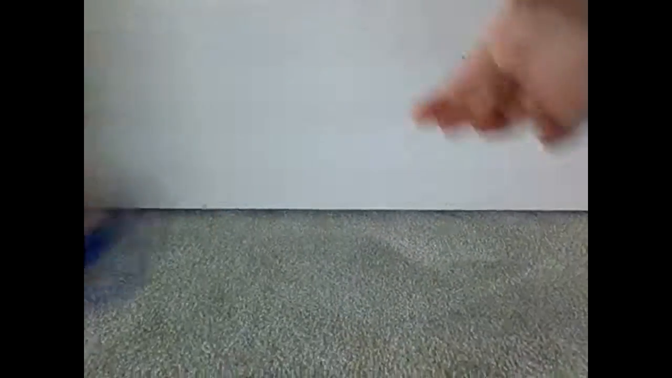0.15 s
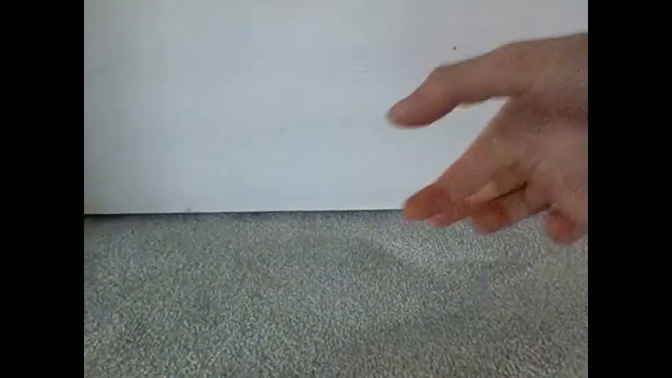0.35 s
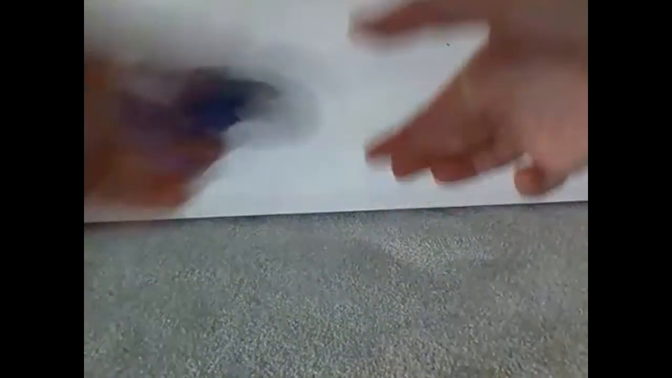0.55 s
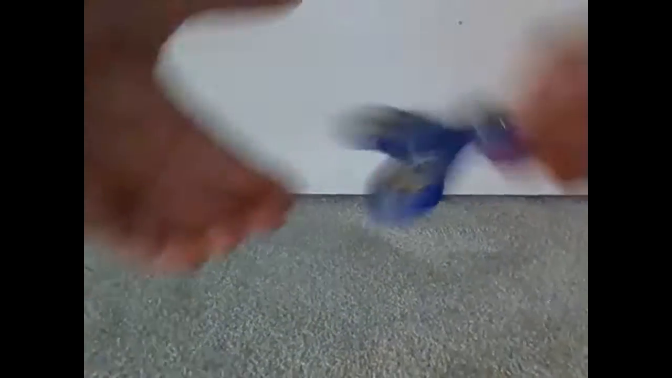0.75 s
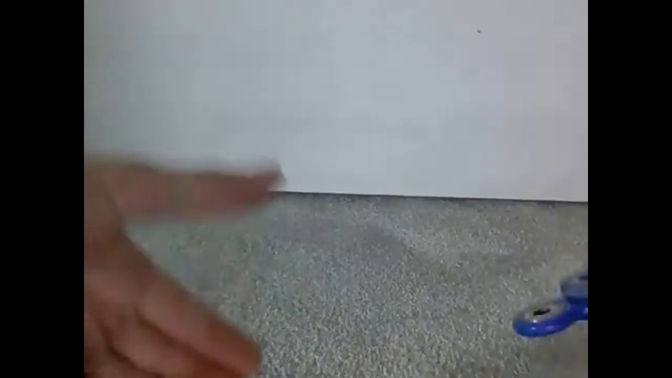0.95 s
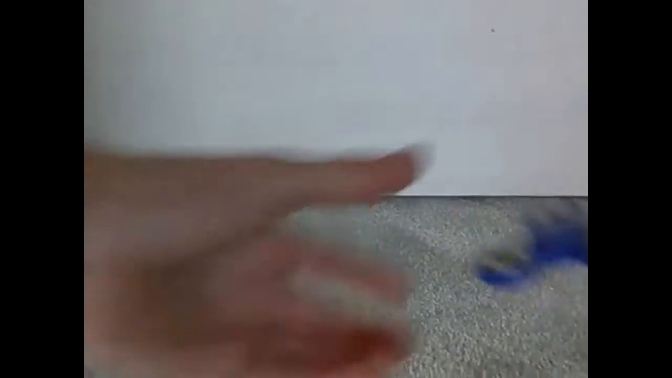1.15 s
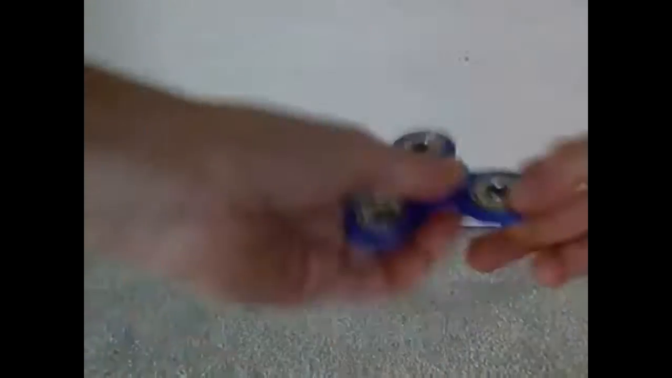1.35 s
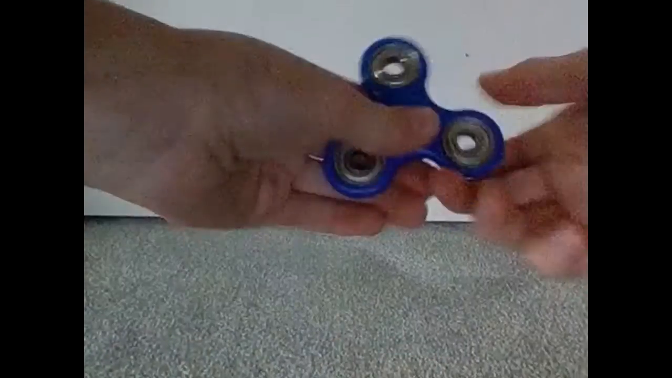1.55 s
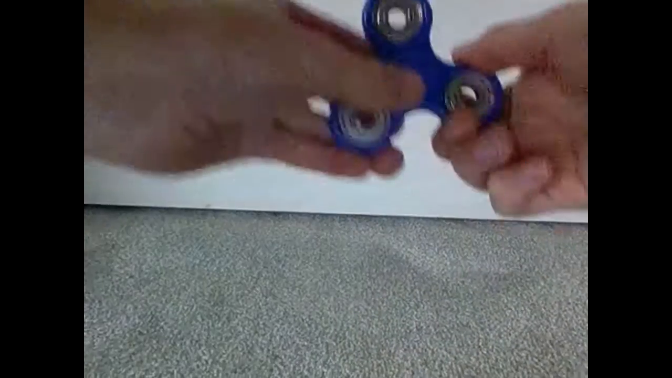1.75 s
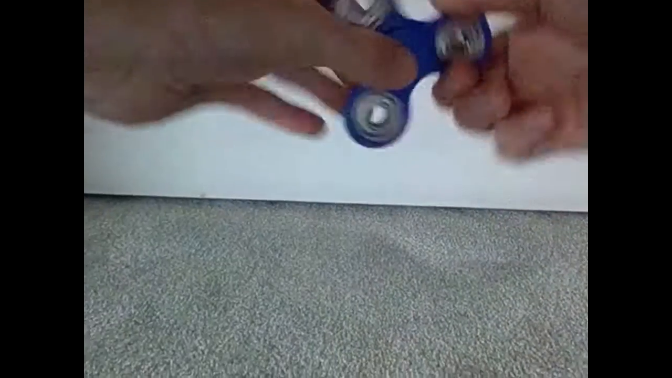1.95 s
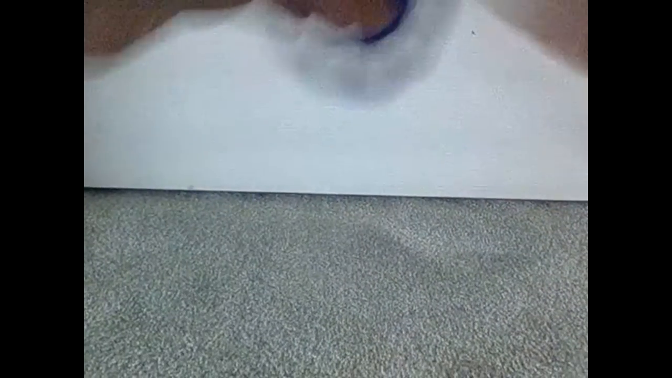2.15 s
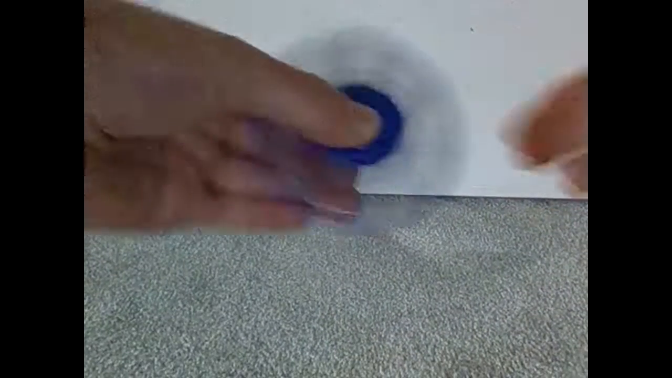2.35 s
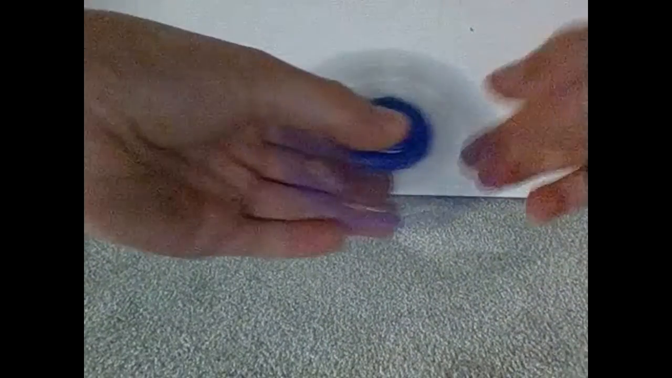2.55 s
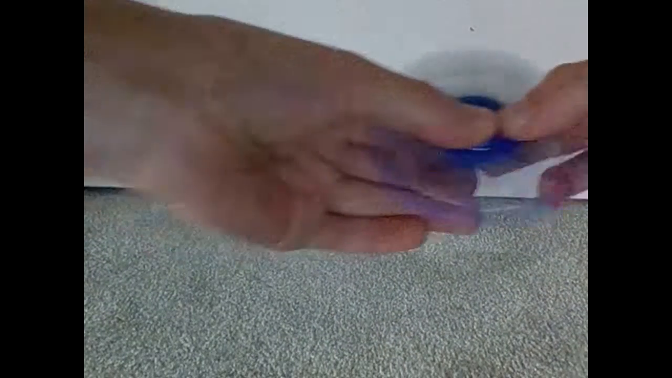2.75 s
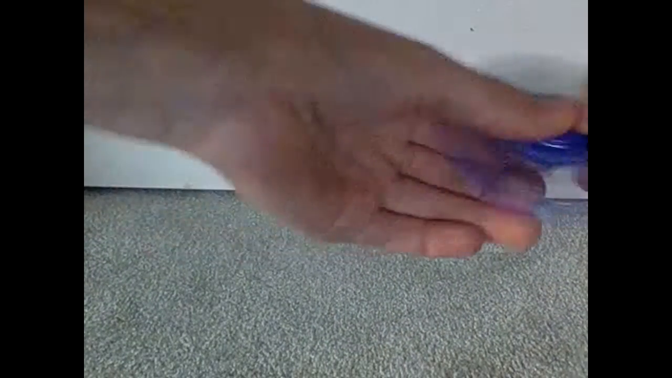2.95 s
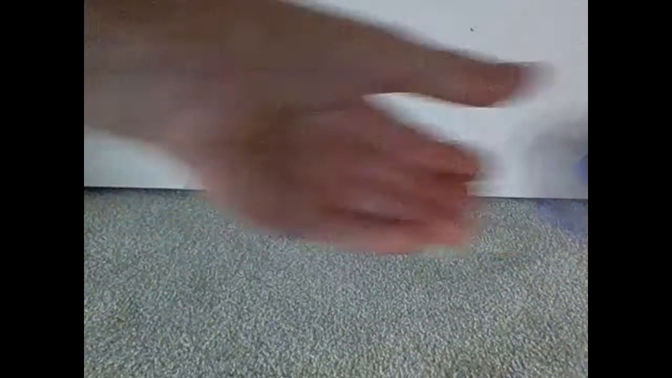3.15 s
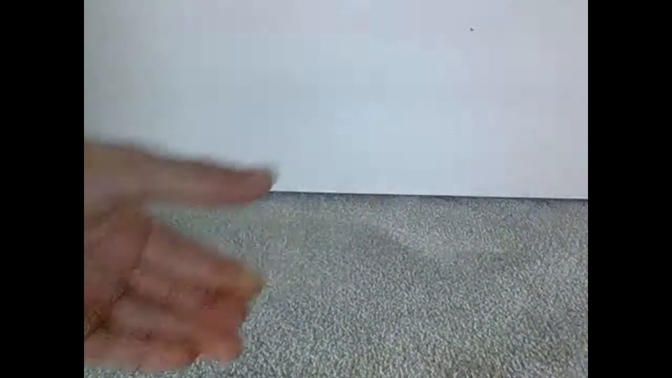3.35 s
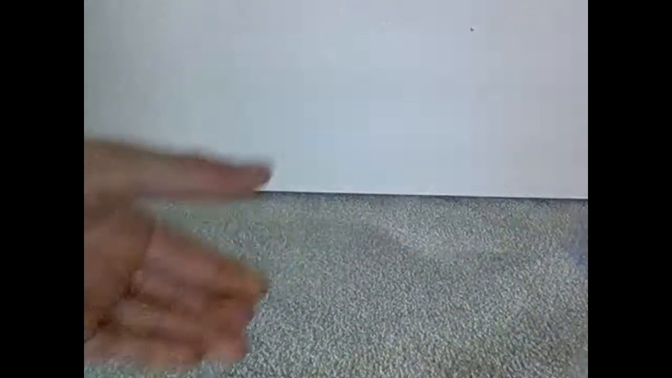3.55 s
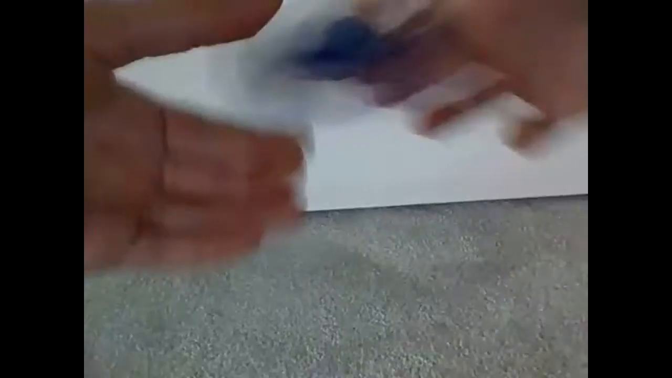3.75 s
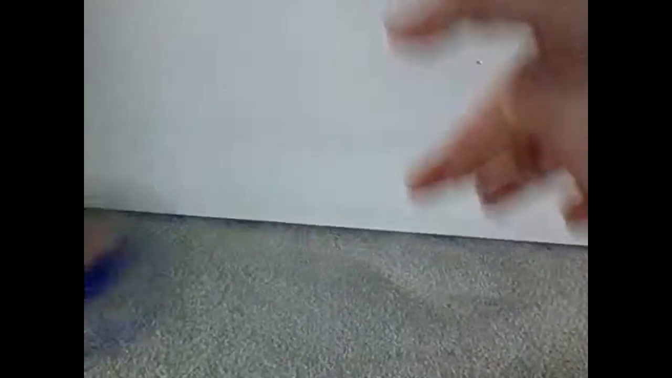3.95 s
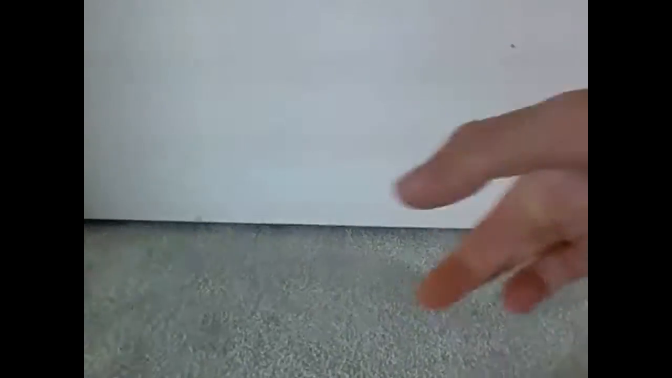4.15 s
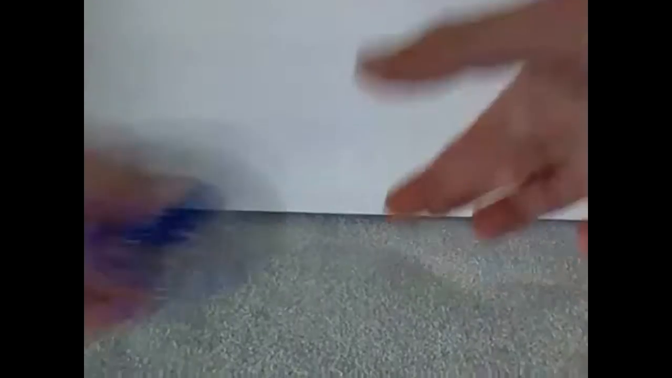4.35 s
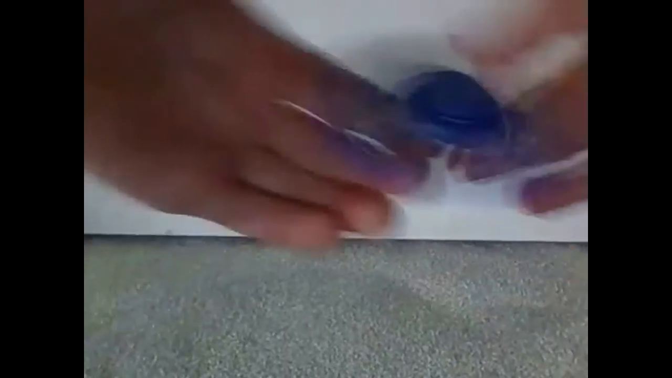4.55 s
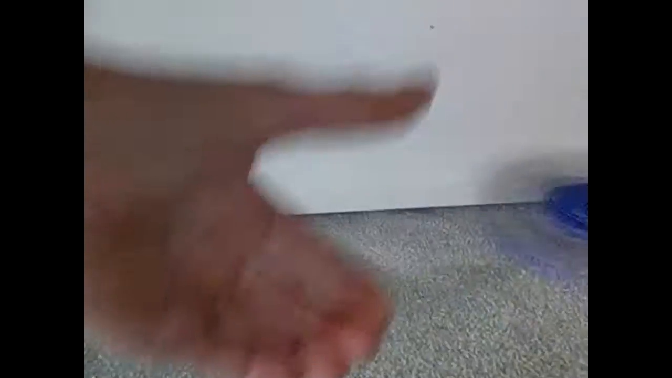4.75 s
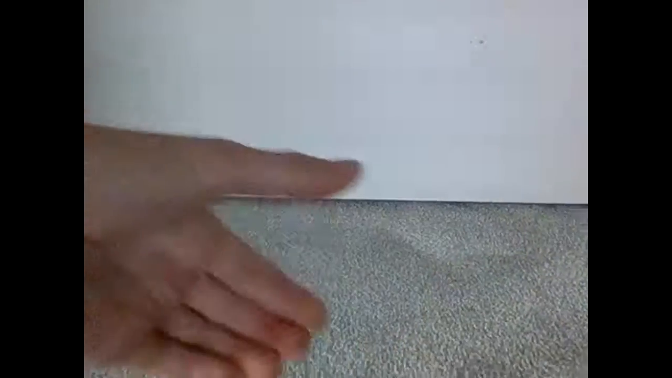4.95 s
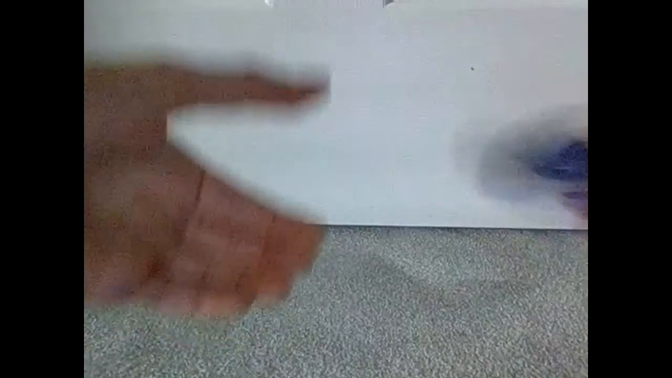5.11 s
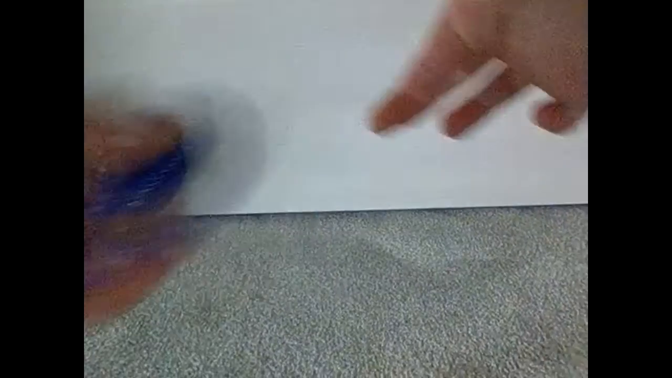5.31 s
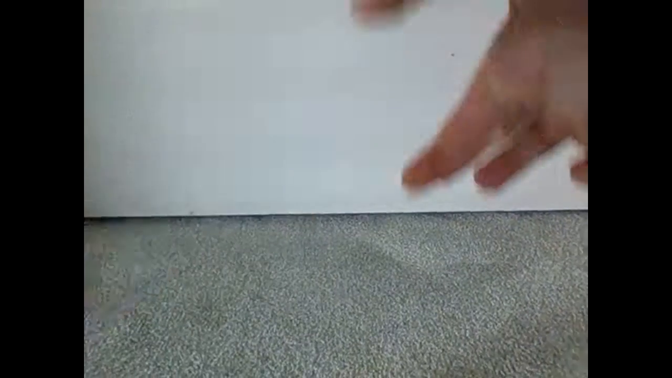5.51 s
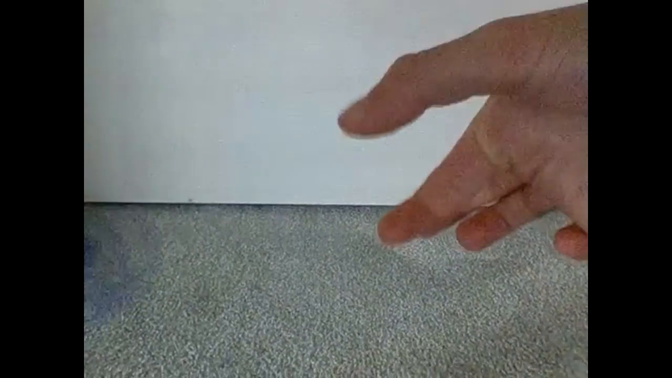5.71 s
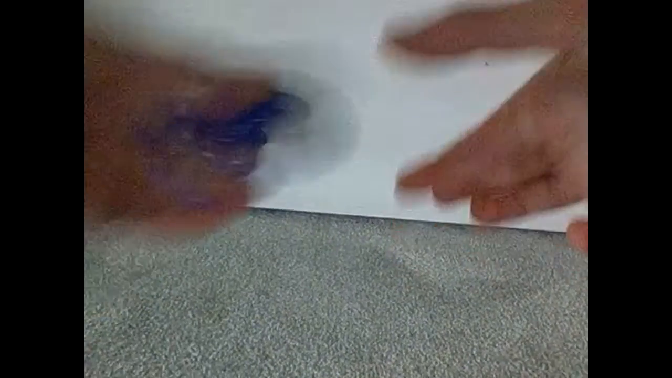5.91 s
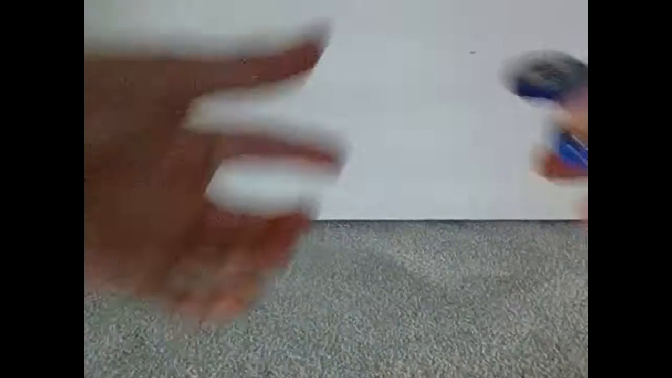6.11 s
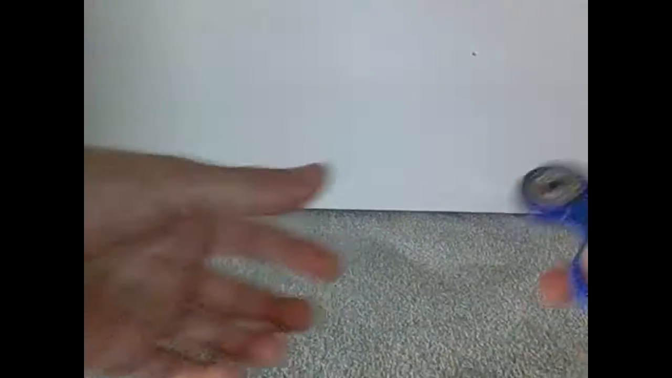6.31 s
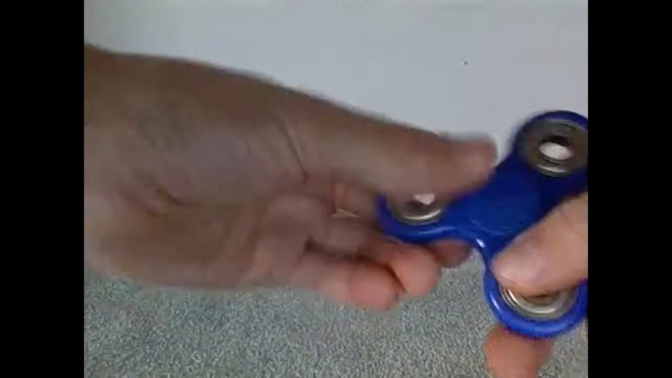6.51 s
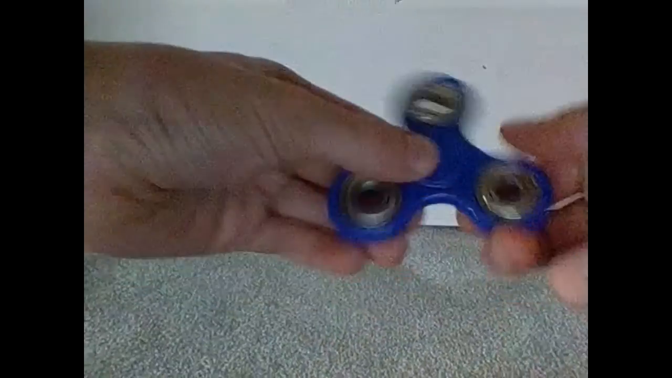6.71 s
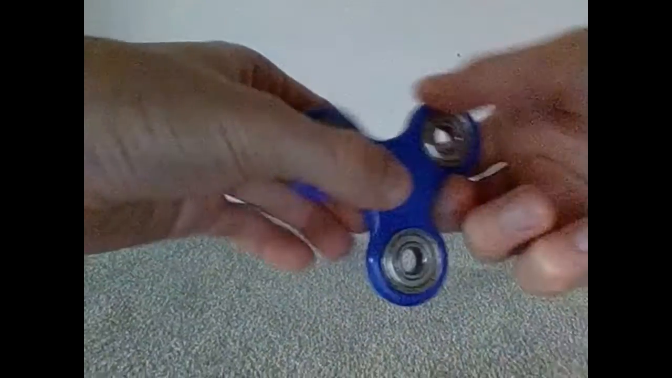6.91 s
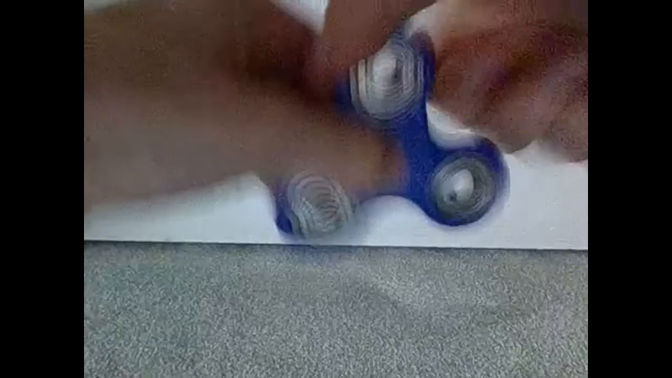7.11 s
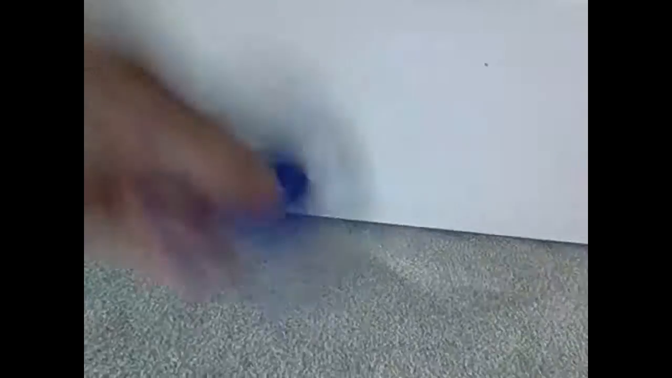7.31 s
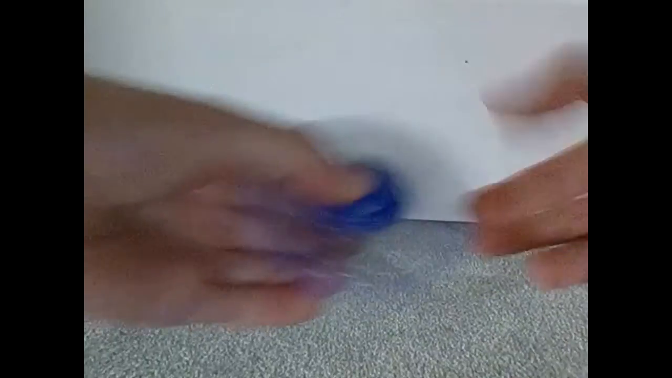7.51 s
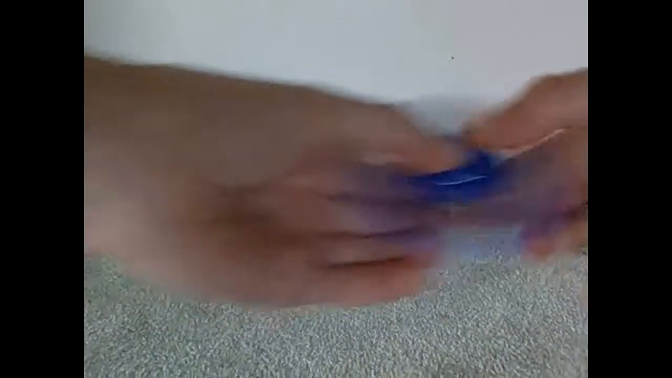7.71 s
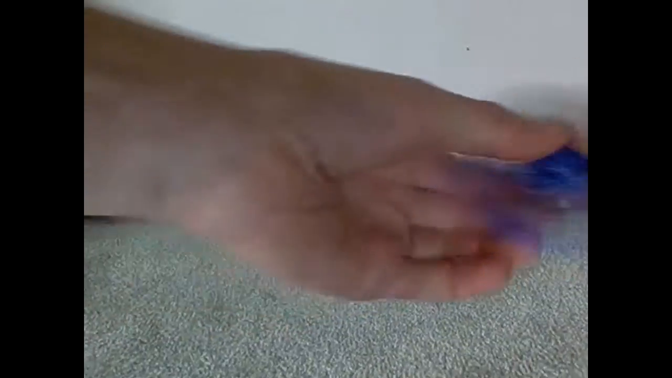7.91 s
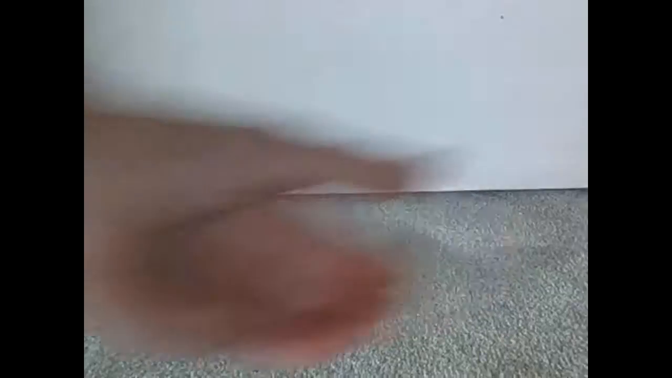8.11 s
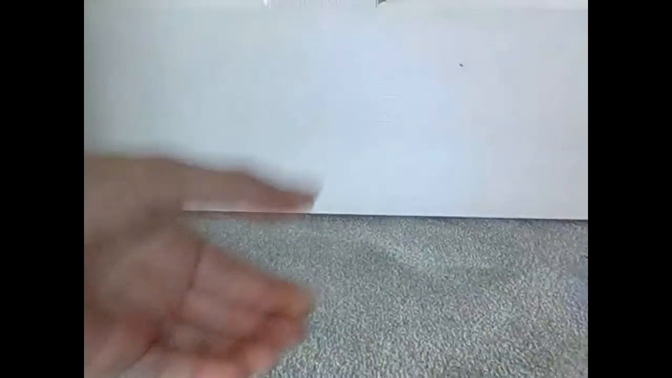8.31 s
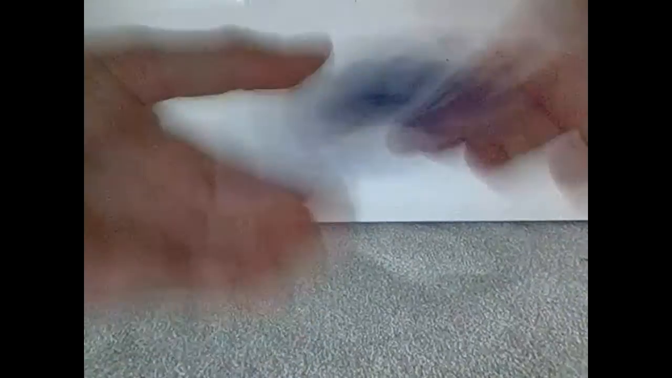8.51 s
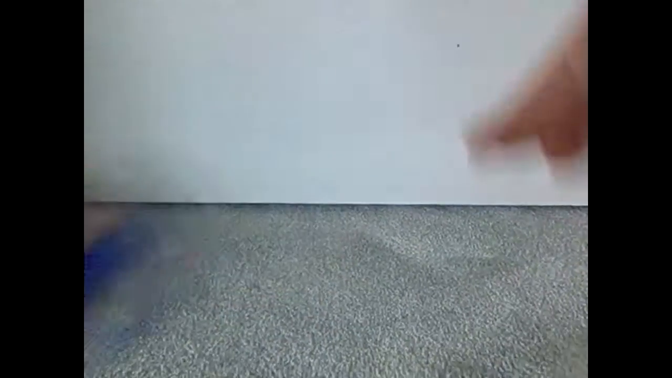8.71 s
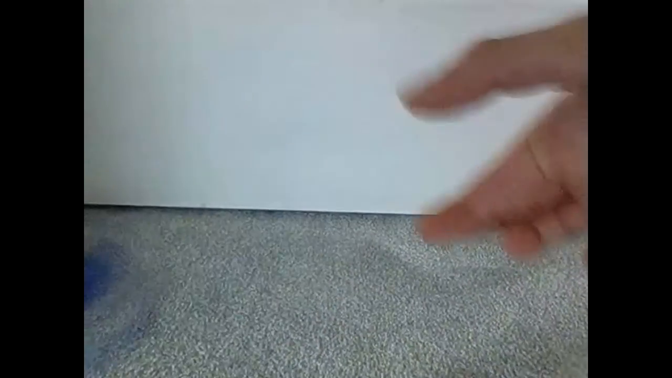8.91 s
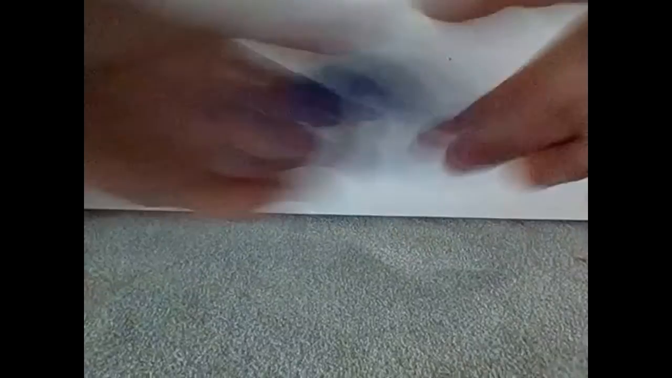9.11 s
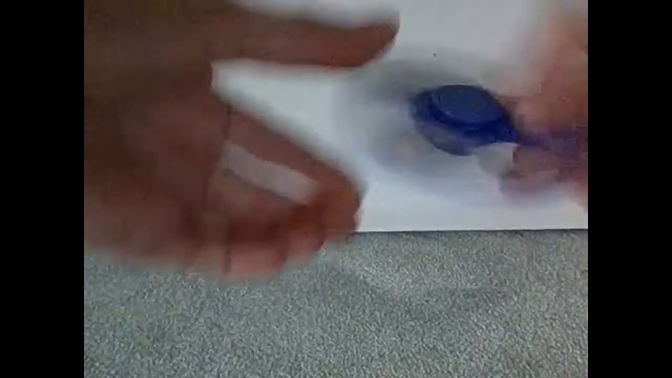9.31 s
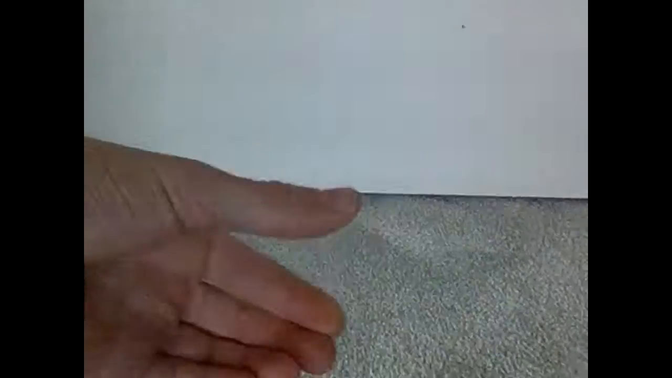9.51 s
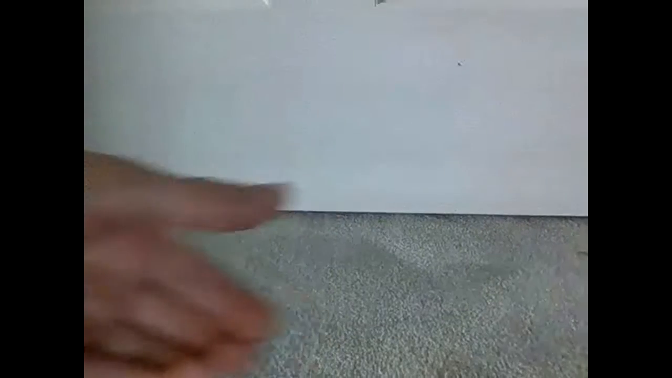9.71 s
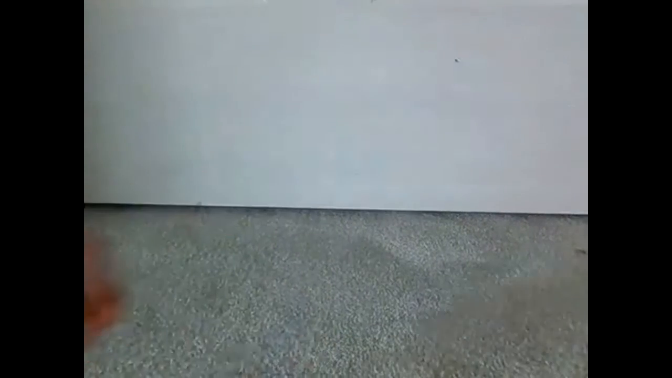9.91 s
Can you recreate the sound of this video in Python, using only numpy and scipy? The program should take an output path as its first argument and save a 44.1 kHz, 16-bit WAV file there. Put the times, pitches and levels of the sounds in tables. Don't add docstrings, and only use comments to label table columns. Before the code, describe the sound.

Close metallic bearing whirr in three runs, with brief toss gaps and plastic clicks, ending in a carpet thump and hard panel knock.

```python
import sys
import numpy as np
from scipy import signal
from scipy.fft import rfft, irfft, next_fast_len
from scipy.io import wavfile
from scipy.ndimage import uniform_filter1d

SR = 44100
rng = np.random.default_rng(int(sys.argv[2]) if len(sys.argv) > 2 else 0)


def materialize(psi):
    bounded = np.clip(np.atleast_2d(psi).T, -1, 1)
    quanta = np.round(bounded * 32767).astype(np.int16)
    wavfile.write(sys.argv[1], SR, quanta)


def voltage_ratio(decibels):
    exponent = np.asarray(decibels, float) / 20
    return 10 ** exponent


N = 439236

# (start [s], finger brakes [s], stop [s], arm passes [Hz], fade while braking [dB])
FLICKS = [
    (0.0, 0.581, 0.64, 50.6, -45),
    (1.994, 5.865, 6.12, 62.03, -4.5),
    (7.026, 9.112, 9.22, 58.6, -13),
]
# (release [s], catch [s], drop [dB], jolt of the catch [dB])
TOSSES = [
    (0.485, 0.533, 14, 5),
    (3.604, 3.655, 10.5, 4),
    (5.069, 5.133, 12.5, 6.5),
    (5.791, 5.867, 11.5, 1.5),
    (8.352, 8.418, 10.5, 4),
    (9.059, 9.094, 16, 4.5),
]
# (time [s], rattle [dB], ring [Hz], ring over rattle [dB], turned away
HOLDS = [(0.0, -32.5, 7600, -0.5, 0.14), (0.1, -32, 7330, 1.5, 0.35), (0.3, -31.5, 7600, 3, 0),
         (0.44, -29, 8300, -1.5, 0.95), (1.99, -31, 7900, 8.5, 0.1), (2.18, -28.5, 7830, 8, 0.15),
         (2.52, -29.5, 7900, -0.5, 0.15), (2.759, -29, 8140, -1.5, 0.16), (2.939, -32.5, 8230, 4.5, 0.84),
         (3.1, -31, 7940, 0.5, 0.7), (3.34, -29.5, 8280, 4, 0.9), (3.654, -30, 7560, -2, 0),
         (4.05, -30.5, 7230, 4, 0), (4.29, -28.5, 8430, 5.5, 0.43), (4.45, -33.5, 7880, 5, 0.43),
         (4.72, -30.5, 8080, 4.5, 0.8), (5.131, -32.5, 8440, 1, 0), (5.2, -32, 7530, 5, 0.01),
         (5.45, -33, 7430, 6.5, 0.05), (5.74, -30, 8100, -5, 0.25), (5.93, -34, 8270, 4.5, 0.53),
         (7.02, -30.5, 8040, 10.5, 0), (7.3, -26.5, 8000, 7, 0.13), (7.5, -28.5, 8330, -4, 0.12),
              (7.78, -31.5, 8100, 5.5, 0.24), (7.93, -29.5, 8070, 5.5, 0.8), (8.15, -28, 8030, 7, 0.65),
              (8.29, -27.5, 8200, -0.5, 1), (8.42, -29.5, 7800, 10, 0.1), (8.52, -27.5, 7400, 3, 0.05),
              (8.68, -29, 8040, -1, 0.5), (8.82, -28.5, 7460, 4, 0.03), (8.96, -28, 7720, 11, 0.27),
              (9.085, -30, 8500, 3, 0.74)]
# (time [s], peak [dB])
SURGES = [(2.0986, -7), (2.1241, -9), (2.158, -10), (2.1904, -6), (2.2263, -7), (2.2697, -6), (2.2837, -4),
          (2.3999, -11), (2.4967, -3), (2.8399, -10), (2.9677, -12), (3.0749, -10), (3.3024, -12),
          (4.0996, -14), (4.1914, -12), (4.5082, -15), (4.5645, -8), (4.778, -12), (4.8354, -12),
          (4.8943, -12), (4.9357, -6), (5.234, -9), (5.3253, -16), (5.3857, -12), (5.472, -14),
          (5.5433, -12), (7.0783, -5), (7.201, -6), (7.4205, -6), (7.9927, -7), (8.0726, -12),
          (8.1369, -12), (8.1544, -7), (8.2926, -7), (8.309, -4), (8.4477, -5), (8.5135, -9), (8.5579, -6),
          (8.5979, -10), (8.6832, -8), (8.9451, -11), (9.0044, -7)]
# (frequency [Hz], density [dB/Hz])
RATTLE = [(2500, -43), (3500, -8.5), (5000, 0.5), (6800, 0), (9200, 3), (10000, 5), (10900, 5), (11200, -2),
          (12500, -5), (14200, -2.5), (14600, 2.5), (15600, 8.5), (16200, -2)]
# (frequency [Hz], width [Hz], level [dB])
RING = [(7250, 700, -1), (7740, 790, 0.5), (8216, 830, -1.5), (8750, 540, 3.5)]
# (frequency [Hz], width [Hz], level [dB])
CAPS = [(4450, 420, 1), (2300, 1100, -9), (4380, 1600, 6), (3550, 1100, -5), (6370, 930, -0.5)]
# (time [s], palm [Hz], fingers [Hz], rim [Hz], palm over rattle [dB])
HOLLOWS = [(0, 1930, 2720, 5200, -16), (.25, 1690, 2900, 5200, -20.5), (.5, 1510, 2820, 5500, -23),
           (2.0, 1500, 2720, 5130, -18.5), (2.3, 1630, 2880, 5100, -16), (2.5, 1870, 3200, 5160, -14.5),
           (2.87, 2160, 3170, 5540, -17), (2.97, 1210, 2670, 5300, -25), (3.2, 1210, 3130, 5960, -28),
           (3.4, 1250, 2580, 5330, -22), (3.6, 1310, 2960, 5900, -30), (3.68, 2050, 2800, 5170, -14),
           (3.95, 1920, 2820, 5300, -18), (4.25, 1950, 2670, 5260, -15.5), (4.42, 1900, 2900, 5750, -28),
           (4.52, 1190, 2840, 5900, -19), (4.65, 1210, 2800, 5500, -26), (4.92, 1250, 2900, 5300, -20.5),
           (5.06, 1300, 2850, 5540, -34), (5.17, 1830, 2900, 5370, -17), (5.4, 1980, 2850, 5340, -15.5),
           (5.6, 2180, 2930, 5330, -13), (5.77, 1900, 2880, 5450, -24), (5.9, 1900, 2950, 6240, -26),
           (7.0, 1600, 2550, 5530, -4), (7.2, 1710, 2640, 5300, -16.5), (7.4, 1800, 3080, 5500, -15.5),
           (7.6, 2110, 3100, 5700, -13.5), (7.82, 2200, 3300, 5660, -16.5), (7.92, 1310, 2970, 5030, -24),
           (8.05, 1250, 3060, 5700, -21), (8.2, 1250, 2900, 5360, -24.5), (8.35, 1410, 3180, 5950, -30),
           (8.47, 1650, 2840, 5270, -18), (8.6, 1680, 3080, 5100, -18), (8.75, 1510, 2450, 4900, -20.5),
           (8.9, 1510, 3040, 5000, -22), (9.05, 1920, 2770, 5530, -18.5)]
# (palm [Hz], fingers [Hz], rim [Hz], thumb [Hz])
HOLLOW_WIDTHS_HZ = (800, 960, 900, 500)
# (frequency [Hz], level over palm [dB])
THUMB = (1190, -10.5)
# (caps [dB], stirred air [dB], fingers [dB], rim [dB], arm beat [dB])
FACING = (-4.5, -8.5, -9.5, -8.5, -41)
# (caps [dB], stirred air [dB], fingers [dB], rim [dB], arm beat [dB])
AWAY = (-18.5, -20, -15.5, -2.5, -63)
# (frequency [Hz], density [dB/Hz])
SWISH = [(90, -37), (150, 3), (280, 2), (430, -3.5), (520, -36)]
# (time [s], peak [dB],
# colour [Hz])
CATCHES = [(0.536, -6, 7800), (0.5484, -17, 8650), (0.5715, 1.3, 9600), (0.5787, -0.5, 15700),
           (0.5864, -5, 8700), (3.66, -14, 8000), (5.135, -10, 8000), (5.153, -3.5, 8700),
           (5.8284, -13, 9350), (5.8985, -6.5, 10600), (5.908, -7, 15600), (5.944, -16, 7950),
           (6.832, -27, 7840), (6.9988, -12, 10300), (7.004, -22, 14500), (7.0245, -20, 10500),
           (7.0295, -15, 15000), (7.048, -9, 9000), (5.853, -15, 12000), (9.149, -11, 10500),
           (9.214, -23, 11840), (8.398, -9, 8750), (9.09, -9, 8350), (9.158, -3.5, 10300),
           (9.177, -9, 15400), (9.2338, -14.5, 9200), (9.354, -10, 15300), (9.349, -15, 10500),
           (9.9507, -16.5, 10800)]
# (time [s], peak [dB], colour [Hz], dull part over peak [dB])
SNAPS = [(1.19, -3.5, 10800, -28), (1.186, -13, 8200, -35), (2.4965, -2, 7700, -45),
         (1.912, -23, 5500, -17), (1.9504, -16, 9540, -27), (5.8575, 4, 10700, -26),
         (5.1356, -6.5, 8200, -30), (5.837, -17, 5000, -30), (6.929, -23, 8150, -22),
         (6.947, -37, 11000, -30), (8.4207, 0.5, 8200, -19.5), (9.2064, -19, 10100, -22),
         (9.7013, 5, 9000, -28), (9.746, -13.5, 4010, -13), (9.772, -8, 8500, -13), (9.787, -12, 5020, -18),
         (9.808, -27, 4000, -10)]
# (time [s], peak [dB], colour [Hz], dull part over peak [dB])
TICKS = [(1.1786, -14, 10600, -36), (1.3954, -33, 2390, -20), (1.491, -28, 14900, -24),
         (1.713, -37, 4500, -19), (1.9614, -29, 15600, -29.5), (1.9854, -20, 4520, -18),
         (1.999, -10.5, 15300, -23), (1.973, -29, 8000, -27), (2.0108, -7, 9700, -26),
         (5.864, -7, 15600, -28), (6.42, -30.5, 7800, -32), (6.4735, -40, 4500, -10),
         (6.486, -34, 8000, -10), (6.6104, -31, 8750, -37), (6.6273, -28, 8400, -28),
         (6.6405, -18.5, 16100, -28), (6.712, -30, 15300, -18), (6.737, -34, 4120, -18),
         (6.9146, -19.5, 10700, -28), (6.917, -23, 7940, -25), (6.988, -27, 8400, -30),
         (7.035, -5, 8400, -26), (9.343, -7.5, 15800, -17), (9.484, -41, 8830, -30),
         (9.601, -28, 8500, -30), (9.518, -33, 9500, -30), (9.532, -38, 11030, -26),
         (9.611, -25, 9600, -30), (9.5034, -23, 16000, -21), (9.591, -19.5, 14400, -21),
         (9.619, -14, 14900, -25), (9.682, -17, 15200, -27), (9.873, -26, 8740, -3)]
# (frequency [Hz], width [Hz], level [dB])
TOY = [(4420, 570, -4), (8200, 570, 1.5), (10700, 1200, -1.5), (14300, 720, -4)]
# (frequency [Hz], width [Hz], level [dB])
PORT = (16160, 1050, 2.1)
# (time [s], peak [dB], low note [Hz], high note [Hz], t60 [s])
KNOCKS = [(.569, -22.5, 219, 473, 0.02), (1.191, -13.5, 4400, 5730, 0.012), (5.855, -21.5, 890, 1530, 0.02),
          (5.8565, -25, 1260, 1860, .02), (5.858, -17.5, 2330, 2660, 0.011), (5.857, -16, 3200, 3440, .01),
          (6.641, -38, 2820, 4500, .012), (6.832, -33, 4400, 3700, 0.0073), (1.395, -41, 2450, 2840, .01),
          (7.045, -34, 1010, 1140, .03), (8.418, -29, 400, 940, 0.022), (9.155, -30, 304, 720, 0.011),
          (9.232, -35, 345, 585, 0.016), (9.343, -18.5, 400, 340, 0.063), (1.952, -37, 2800, 5000, .01),
          (5.898, -24, 2950, 4600, .015), (5.944, -28, 4800, 2900, .012), (2.953, -37, 190, 330, 0.038)]
# (time [s], peak [dB], low note [Hz], high note [Hz], t60 [s])
PANEL_KNOCKS = [(9.7017, -4, 640, 760, 0.043), (9.702, -9.5, 1188, 960, .04), (9.701, -15, 2380, 1730, .03),
                (9.88, -26, 205, 297, .09), (9.711, -12.5, 200, 608, 0.13), (9.716, -16.5, 400, 332, .05),
                (9.745, -20, 880, 1300, 0.014), (9.772, -10.5, 740, 1250, 0.021),
                (9.786, -12.5, 800, 1240, 0.014), (9.80, -21, 205, 560, 0.054),
                (9.872, -24, 800, 1190, 0.03)]
# (time [s], bright level [dB], panel over bright [dB])
CLATTER_LEVELS = [
    (9.698, -31, -22),
    (9.703, -17, 1),
    (9.726, -21.5, -3),
    (9.77, -29, 0),
    (9.82, -36.5, 6.5),
    (9.865, -42.5, 2.5),
    (9.912, -46.5, 6),
    (9.958, -49, -3),
]
# (frequency [Hz], density [dB/Hz])
CLATTER = [(880, -20), (1500, 6.5), (3010, 2.5), (3430, 4.5), (4860, 3), (5930, -1.5), (9750, -0.5),
           (16200, -7.5)]
# (frequency [Hz], width [Hz], level [dB])
PANEL = [(247, 520, 1.5), (470, 250, -12), (800, 780, 2), (1190, 70, 8.5), (1300, 160, -2)]
# (time [s], peak [dB], brightness [dB], ring-time factor [ratio])
THUMPS = [
    (9.341, -9.5, -0.5, 0.44),
    (9.351, -18, -10, 0.47),
    (9.363, -9.5, -20, .9),
    (9.599, -20, -9, 0.61),
    (9.615, -19, -17, 0.41),
    (9.652, -29, -7, 0.89),
    (9.685, -21.5, -11, 0.37),
    (9.87, -25, -8, 1),
]
# (frequency [Hz], level [dB], t60 [s])
BOARDS = [(85.3, 1, 0.19), (157.6, -7.5, 0.32), (200, 0, 0.15), (286, -6.5, 0.21), (352, 1, 0.15),
          (400, -13, 0.22)]
# (time [s], length [s], level [dB], colour [Hz])
RUBS = [
    (0.728, .055, -50, 14500),
    (1.171, 0.0097, -34, 8000),
    (1.57, 0.029, -54, 10900),
    (6.25, 0.065, -53, 13500),
    (6.588, 0.091, -49.5, 8500),
    (9.343, 0.041, -40.5, 9500),
    (9.37, .06, -52, 10000),
    (9.472, .02, -54, 8800),
    (9.601, 0.1, -53, 4950),
]
# (time [s], peak [dB], optional slower push [Hz])
PUFFS = [(0.62, -30), (2.004, -15.5), (2.3, -24), (3.671, -19.5), (5.7, -21.5), (5.861, -25), (6.9, -27, 9),
         (6.97, -21, 14), (7.045, -13.5), (7.8, -20), (8.422, -22), (9.047, -29)]
# (frequency [Hz], t60 [s])
ROOM = [(100, 0.96), (1000, 0.041), (4000, 0.34), (16000, 0.18)]
# (frequency [Hz], density [dB/Hz])
AIR = [(8.8, -5.5), (15, 2.5), (36, -12), (55, -6), (133, -15.5), (218, -29.5), (260, -16.5), (309, -26.5),
       (507, -31), (1140, -35), (1320, -35.5), (2370, -35), (3560, -38), (15700, -36.5)]
# (frequency [Hz], waver [Hz], level [dB])
HUM = (220, 1.085, -64.5)

BRAKE_CAPS_DB = 7.5


def spin(start, brake, stop, start_hz, fade_db):
    t = np.arange(start, stop, 1 / SR)
    rattle_db, ring_hz, ring_db, away = hold(t)
    caps_db, arms_db, fingers_db, rim_db = (a + (b - a) * away for a, b in zip(FACING[:4], AWAY))
    braked = t > brake
    jolt_s = 0.025
    jolt_db = sum(db * ((t > b) & (t < b + jolt_s)) for a, b, drop, db in TOSSES)
    rattle_db = rattle_db + braked * fade_db * (t - brake) / (stop - brake) + jolt_db
    drag_db = BRAKE_CAPS_DB * braked
    caps_start_db = -6 * (start > 0) * np.exp(-(t - start) / 0.18)
    caps_db = caps_db + drag_db + caps_start_db
    free_db = sum(-db * ((t > a) & (t < b)) for a, b, db, jolt in TOSSES)
    free_db = uniform_filter1d(free_db - 8.0 * braked, size=100)
    turns = np.cumsum(passes_hz(t, start_hz)) / SR / 3

    balls = ball_impacts(t, turns)
    grind = voltage_ratio(surges_db(t, rattle_db))
    rough = balls * grind * voltage_ratio(1.7 * wander(len(t), 380))
    ring = body(rough, RING, ring_hz, 394, 3.1, 62) * voltage_ratio(0.57 * wander(len(t), 120))
    plastic = voltage_ratio(caps_db) * body(balls, CAPS, 5000, 3000, 3.1, 80)
    plastic = plastic + hand_hollows(balls, t, fingers_db + drag_db, rim_db + drag_db)
    grip_db = (0.24 - 1.5) * jolt_db
    plastic = 0.9 * voltage_ratio(grip_db) * palm_echo(plastic, t, turns)
    swish_db = 0.43 * arms_db - 19.5 + 1.4 * wander(len(t), 17)
    swish = coloured(rng.standard_normal(len(t)), SWISH) * voltage_ratio(swish_db)
    rattle = coloured(balls * grind ** 0.62, RATTLE)
    cage = signal.filtfilt(*signal.butter(3, 13500, "high", fs=SR), rattle)
    race = voltage_ratio(5.0) * (cage + voltage_ratio(0.87 * free_db) * (rattle - cage))
    parts = race + voltage_ratio(free_db) * (voltage_ratio(ring_db) * ring + plastic) + swish
    rise = (t - start + (start == 0)) / 0.03
    fade = np.clip(np.minimum(rise, (stop - t) / 0.013), 0, 1)
    return start, voltage_ratio(uniform_filter1d(rattle_db, size=100)) * parts * fade


def ball_impacts(t, turns):
    hit, size, sign = rng.random((len(t), 3)).T
    impacts_per_s = 12000
    balls = (hit < impacts_per_s / SR) * voltage_ratio(-1.8 * np.log(size + 0.0015)) * np.sign(sign - .5)
    load_db = 0.1 * np.cos(2 * np.pi * turns) + 1.0 * wander(len(t), 67) + 1.12 * wander(len(t), 285)
    return evened(balls * voltage_ratio(load_db))


def hand_hollows(balls, t, fingers_db, rim_db):
    s, *columns = np.transpose(HOLLOWS)
    palm_hz, fingers_hz, rim_hz, palm_db = (np.interp(t, s, c) for c in columns)
    thumb_hz, thumb_db = THUMB
    notes_hz = palm_hz, fingers_hz, rim_hz, thumb_hz
    levels_db = palm_db, fingers_db, rim_db, palm_db + thumb_db
    return sum(hollow(balls, *one) for one in zip(notes_hz, HOLLOW_WIDTHS_HZ, levels_db))


def hollow(x, hz, width_hz, db):
    own = x * rng.choice([-1., 1.], len(x)) * voltage_ratio(2.2 * wander(len(x), 170))
    hit, size = rng.random((len(x), 2)).T
    pings_per_s, ping_width_hz, ping_db = 60, 240, -6
    ping_hz = hz * np.exp(0.132 * wander(len(x), 30.3))
    pings = (hit < pings_per_s / SR) * (0.28 + size)
    pings = resonate(resonate(pings, ping_hz, ping_width_hz), ping_hz, ping_width_hz)
    hz = hz * (1 + 0.067 * wander(len(x), 46))
    both = evened(resonate(resonate(own, hz, width_hz), hz, width_hz)) + voltage_ratio(ping_db) * evened(pings)
    return voltage_ratio(db - 1.0 + 1.0 * wander(len(x), 32)) * both


def palm_echo(x, t, turns):
    bend = 0.23 * wander(len(t), 6.9) + 0.15 * np.cos(2 * np.pi * 3 * turns)
    delay_s = 0.000593 * np.exp(bend)
    return x + 0.24 * np.interp(t - delay_s, t, x)


def hold(t):
    s, *columns = np.transpose(HOLDS)
    now = np.searchsorted(s, t + 1e-6, "right") - 1
    ease_s, shift_s = 0.21, 0.078
    spans_s = ease_s, shift_s, ease_s, ease_s
    return [uniform_filter1d(c[now], round(span * SR), mode="nearest") for c, span in zip(columns, spans_s)]


def passes_hz(t, start_hz):
    catch_loss, sag_hz_per_s = 0.1, 0.585
    caught = sum((t > b) * (b > t[0]) for a, b, *rest in TOSSES)
    return start_hz * (1 - catch_loss) ** caught - sag_hz_per_s * (t - t[0])


def surges_db(t, rattle_db):
    rise_s, fall_s, from_db = 0.0024, 0.006, 16
    out = np.zeros(len(t))
    for s, db in SURGES:
        since = t - s - rise_s
        shape = np.exp(-abs(since) / np.where(since > 0, fall_s, rise_s))
        out = np.maximum(out, np.clip(db - rattle_db - from_db, 0, 6) * shape)
    return out


def arms_beating(start, brake, stop, start_hz, fade_db):
    t = np.arange(start, brake, 1 / SR)
    fade_db_per_s = -2
    db = FACING[4] + (AWAY[4] - FACING[4]) * hold(t)[3] + fade_db_per_s * (t - start)
    phase = 2 * np.pi * np.cumsum(passes_hz(t, start_hz) + 2.07 * wander(len(t), 9.6)) / SR
    level = voltage_ratio(db + 1.7 * wander(len(t), 4.5))
    return start, level * np.sin(phase) * signal.windows.tukey(len(t), .05)


def click(s, db, hz, dull_db, t60):
    lead_s = .01
    t = np.arange(round(.08 * SR)) / SR - lead_s
    shape_db = np.where(t < 0, 60 * t / (0.51 * t60), -60 * t / t60)
    burst = rng.standard_normal(len(t)) * voltage_ratio(shape_db)
    crack = signal.lfilter(*signal.butter(3, min(.5 * hz, 7000), "high", fs=SR), burst)
    bright = signal.lfilter(*signal.butter(3, 3300, "high", fs=SR), burst)
    port_hz, port_width_hz, port_db = PORT
    sharp = 0.34 * crack + 2.0 * resonate(crack, min(hz, 16000), 670)
    sharp = sharp + voltage_ratio(port_db) * resonate(crack, port_hz, port_width_hz)
    sharp = sharp + 0.5 * sum(voltage_ratio(d) * resonate(bright, f, w) for f, w, d in TOY)
    dull = resonate(resonate(burst, 1170, 1400), 1660, 1600) + 1.9 * resonate(burst, 300, 280)
    both = sharp / abs(sharp).max() + voltage_ratio(dull_db) * dull / abs(dull).max()
    return s + .0012 - lead_s, voltage_ratio(db) * both


def knock(s, db, low_hz, high_hz, t60, high_db):
    t = np.arange(round(.2 * SR)) / SR
    notes = ringing([(low_hz, 0, t60), (high_hz, high_db, 0.59 * t60)], t)
    notes = notes * (1 - np.exp(-(t / 0.0017) ** 2))
    notes = notes * (1 + .18 * wander(len(t), 0.3 * low_hz))
    return s, voltage_ratio(db) * notes / abs(notes).max()


def clatter():
    s, bright_db, panel_db = np.transpose(CLATTER_LEVELS)
    t = np.arange(s[0], s[-1], 1 / SR)
    shake = rng.standard_normal(len(t)) * voltage_ratio(1.9 * wander(len(t), 280))
    panel = voltage_ratio(np.interp(t, s, panel_db)) * body(shake, PANEL, 700, 2000, 2.1, 82)
    both = coloured(shake, CLATTER) + panel
    return s[0], voltage_ratio(np.interp(t, s, bright_db)) * both * signal.windows.tukey(len(t), .02)


def thump(s, db, bright_db, rings):
    t = np.arange(round(.4 * SR)) / SR
    blow = signal.windows.hann(round(0.0041 * SR))
    low = -np.convolve(ringing(BOARDS, t / rings, rings), blow)[:len(t)]
    low = signal.lfilter(*signal.butter(3, 55, "high", fs=SR), low)
    scuff = evened(resonate(resonate(rng.standard_normal(len(t)), 230, 700), 250, 1200))
    scuff = voltage_ratio(bright_db - 11.5 - 60 * t / 0.17) * scuff * np.minimum(t / 0.0021, 1)
    return s, voltage_ratio(db) * (low / abs(low).max() + scuff)


def rub(s, length_s, db, hz):
    count = round(length_s * SR)
    hiss = evened(resonate(resonate(rng.standard_normal(count), hz, 2800), hz, 2800))
    return s, voltage_ratio(db + 2.0 * wander(count, 200)) * hiss * signal.windows.tukey(count, .5)


def puff(s, db, hz=23.2):
    t = np.arange(round(.14 * SR)) / SR
    swell = t * hz * 0.67 * np.exp(1 - t * hz * 2.27)
    return s, voltage_ratio(db) * swell * (np.sin(2 * np.pi * hz * t) + 0.23 * wander(len(t), 480))


def evened(x):
    return x / np.sqrt(np.mean(x ** 2) + 1e-20)


def wander(count, per_s):
    span = max(int(SR / per_s), 1)
    smooth = uniform_filter1d(uniform_filter1d(rng.standard_normal(count), span), span)
    return np.clip(evened(smooth), -3, 2.3)


def read(points, hz):
    f, value = np.transpose(points)
    return np.interp(np.log(hz + 1), np.log(f + 1), value)


def coloured(x, points):
    size = next_fast_len(len(x))
    gain = voltage_ratio(read(points, np.fft.rfftfreq(size, 1 / SR)))
    return evened(irfft(rfft(x, size) * gain, size)[:len(x)])


def resonate(x, hz, width_hz):
    turn = np.exp(2j * np.pi * np.cumsum(hz * np.ones(len(x))) / SR)
    r = np.exp(-np.pi * width_hz / SR)
    return 2 * (turn * signal.lfilter([1 - r], [1, -r], x / turn + 1e-18)).real


def body(x, modes, centre_hz, reach_hz, patchy_db, per_s):
    out = 0
    for hz, width_hz, db in modes:
        near_db = -6 * np.minimum(((hz - centre_hz) / reach_hz) ** 2, 3)
        level = voltage_ratio(db + near_db + patchy_db * wander(len(x), per_s))
        out = out + level * resonate(resonate(x, hz, width_hz), hz, width_hz)
    return evened(out)


def ringing(modes, t, rings=1):
    return sum(voltage_ratio(db - 60 * t / t60) * np.sin(2 * np.pi * hz * t * rings) for hz, db, t60 in modes)


def add(mix, s, sound):
    part = mix[round(s * SR):][:len(sound)]
    part += sound[:len(part)]


def room(x):
    taps = np.zeros(SR // 2)
    at = np.arange(160, len(taps) - 20, 20)
    taps[at + rng.integers(0, 20, len(at))] = rng.choice([-1., 1.], len(at))
    hz, t, z = signal.stft(taps, SR, nperseg=256)
    tail = signal.istft(z * voltage_ratio(-60 * t / read(ROOM, hz)[:, None]), SR, nperseg=256)[1]
    return signal.fftconvolve(x, tail / np.linalg.norm(tail))[:N]


def room_air():
    air_db = -45.5
    air = voltage_ratio(air_db) * coloured(rng.standard_normal(N), AIR) * voltage_ratio(1.28 * wander(N, 0.55))
    air = air + 0.58 * resonate(air, PORT[0], 1900)
    hz, waver_hz, db = HUM
    phase = 2 * np.pi * np.cumsum(hz + waver_hz * wander(N, 4.5)) / SR
    return air + voltage_ratio(db + 3.6 * wander(N, 3.3)) * np.sin(phase)


def scene():
    toy, hits, knocks, air = np.zeros((4, N))
    for flick in FLICKS:
        add(toy, *spin(*flick))
        add(air, *arms_beating(*flick))
    # dull dB and t60 s, t60 s, or high note dB
    layers = ((click, CATCHES, hits, -33.5, 0.018),
              (click, SNAPS, hits, 0.013),
              (click, TICKS, hits, 0.017),
              (knock, KNOCKS, knocks, 2.5),
              (knock, PANEL_KNOCKS, hits, 0),
              (thump, THUMPS, hits),
              (rub, RUBS, hits),
              (puff, PUFFS, air))
    for source, events, mix, *shared in layers:
        for event in events:
            add(mix, *source(*event, *shared))
    add(hits, *clatter())
    echo = room(voltage_ratio(-19.0) * toy + voltage_ratio(-25) * knocks + voltage_ratio(-20) * hits)
    return (toy + hits + knocks + air + echo + room_air())[None]


def band_limit(x):
    return signal.sosfilt(signal.butter(12, 17000, fs=SR, output="sos"), x)


def record(dry):
    soft = .8 * np.tanh(dry / .8)
    edge_hz = 15800
    edge = signal.firwin(801, edge_hz, window=("kaiser", 9), fs=SR)
    mix = signal.oaconvolve(soft, edge[None], "same")
    return band_limit(mix)


dry = scene()
out = record(dry)
materialize(out)
```